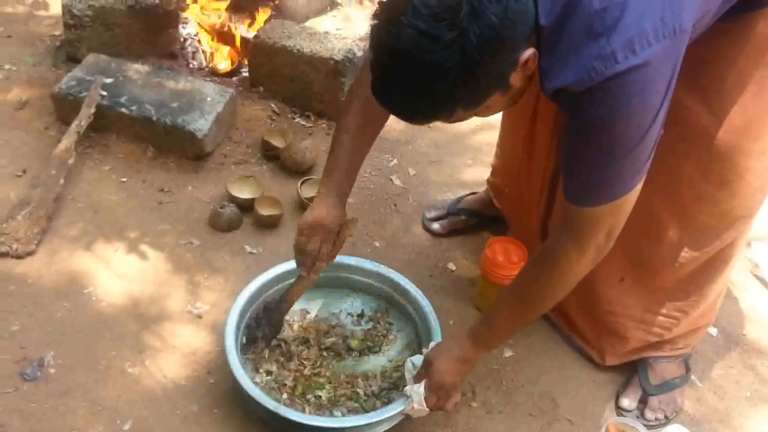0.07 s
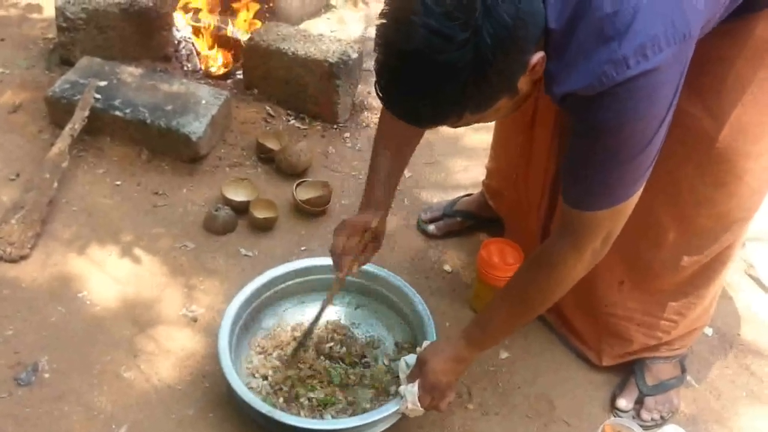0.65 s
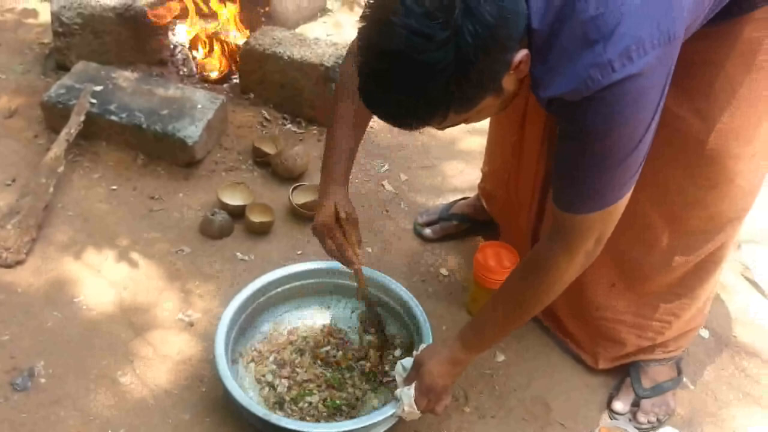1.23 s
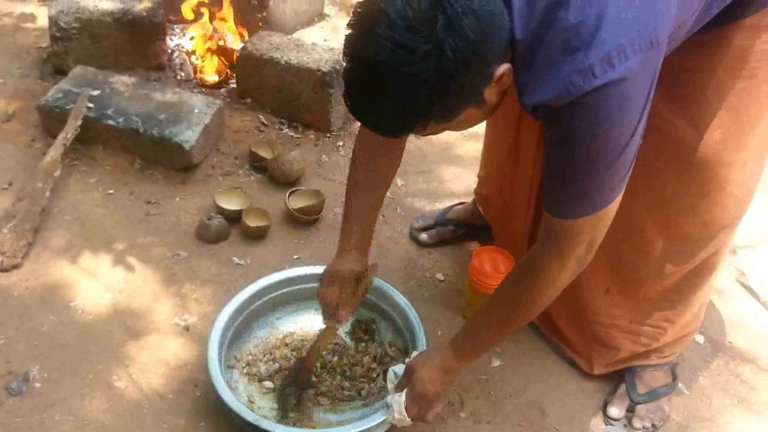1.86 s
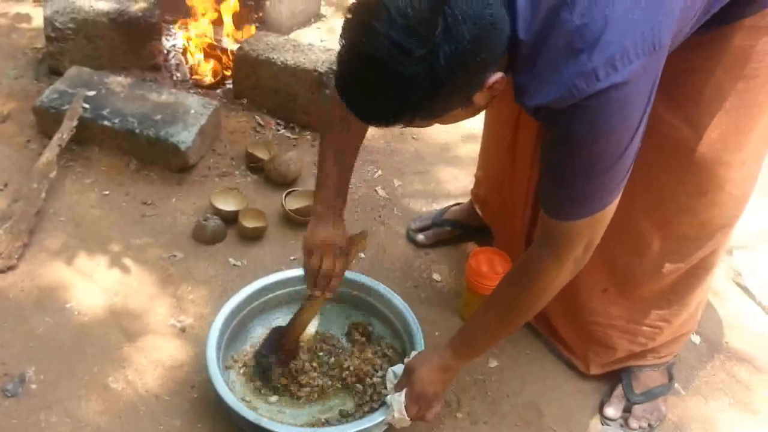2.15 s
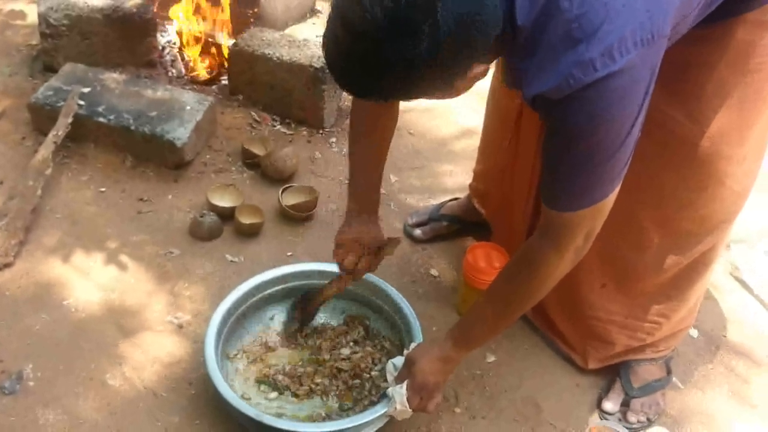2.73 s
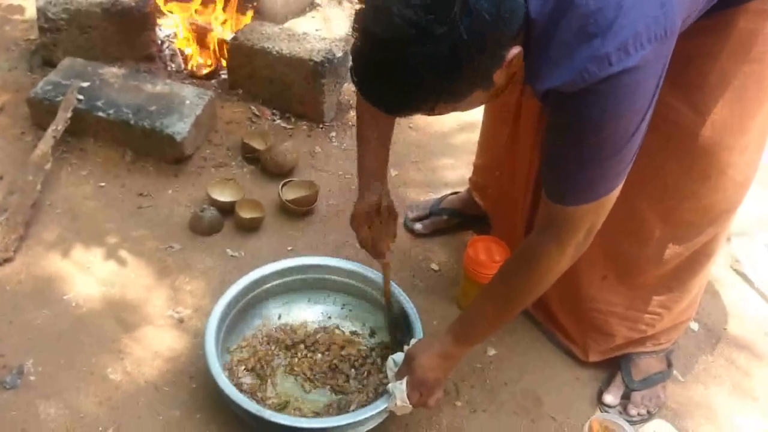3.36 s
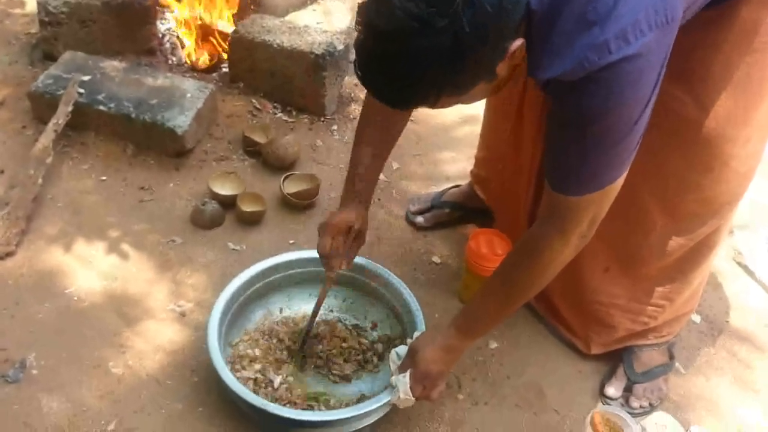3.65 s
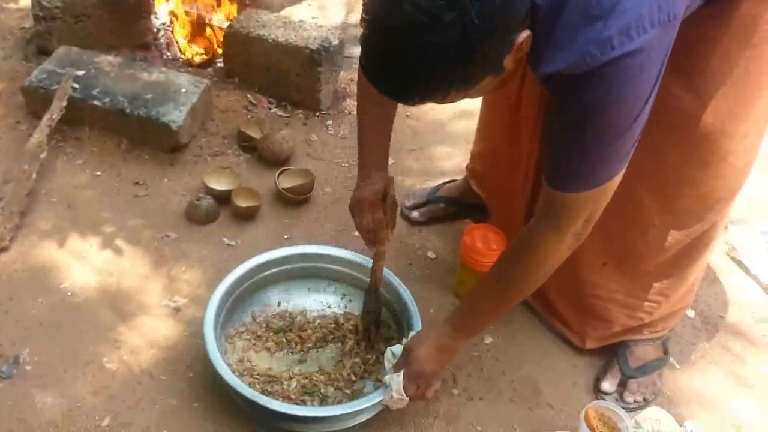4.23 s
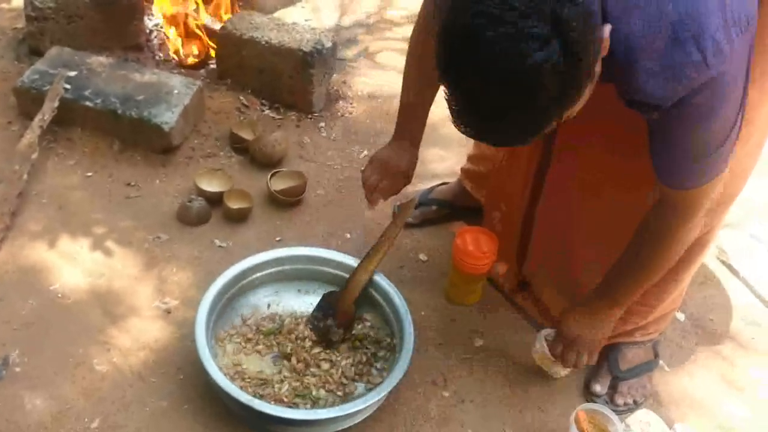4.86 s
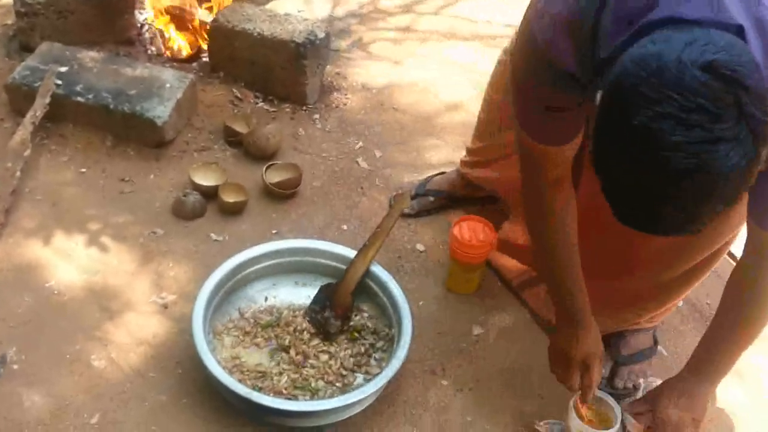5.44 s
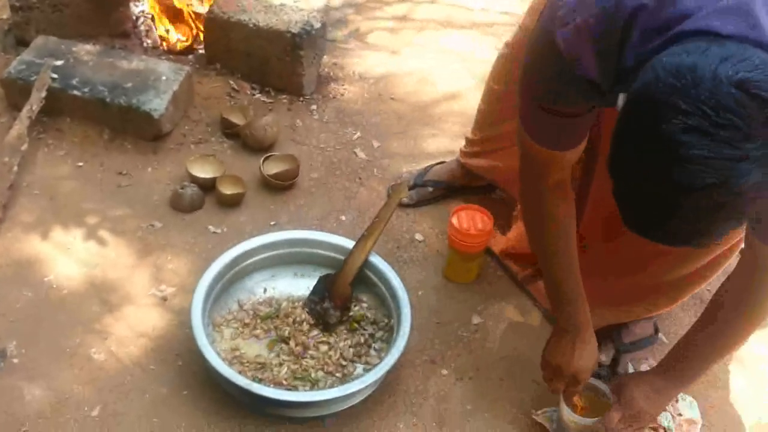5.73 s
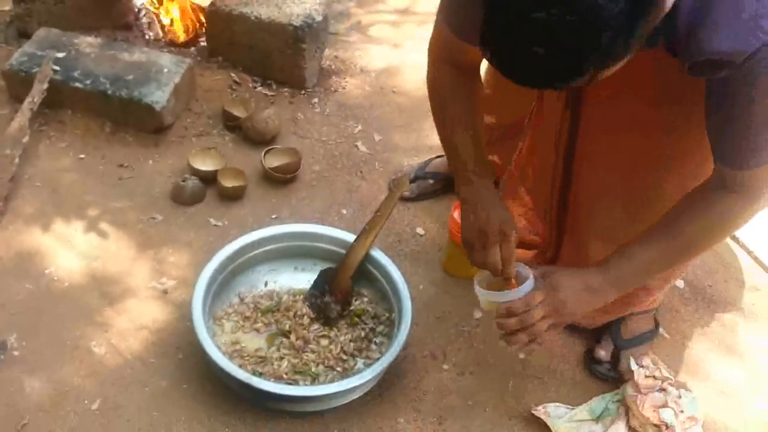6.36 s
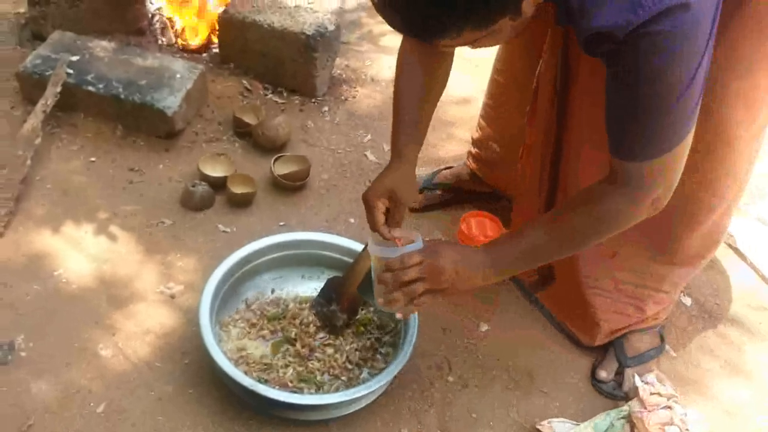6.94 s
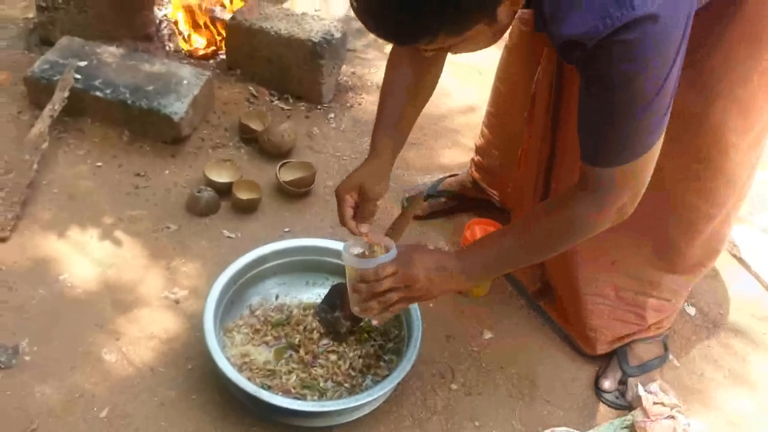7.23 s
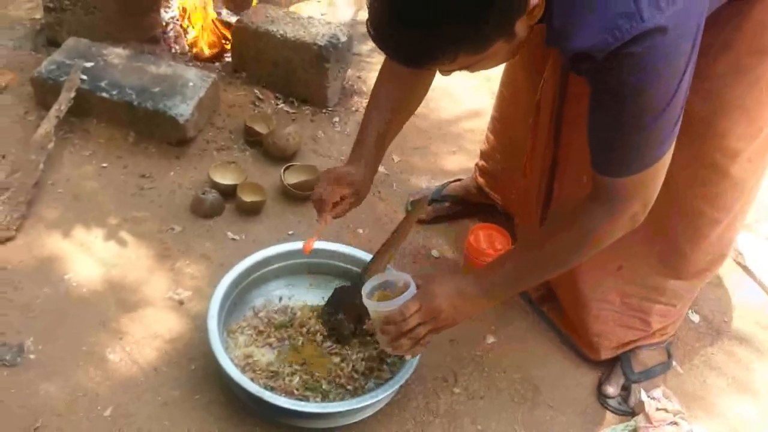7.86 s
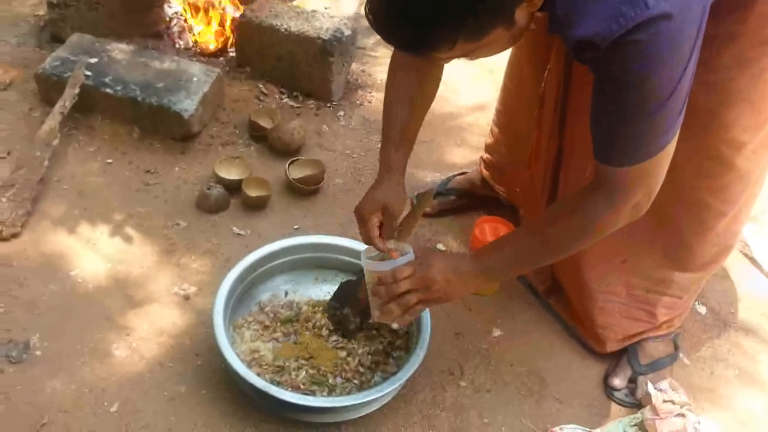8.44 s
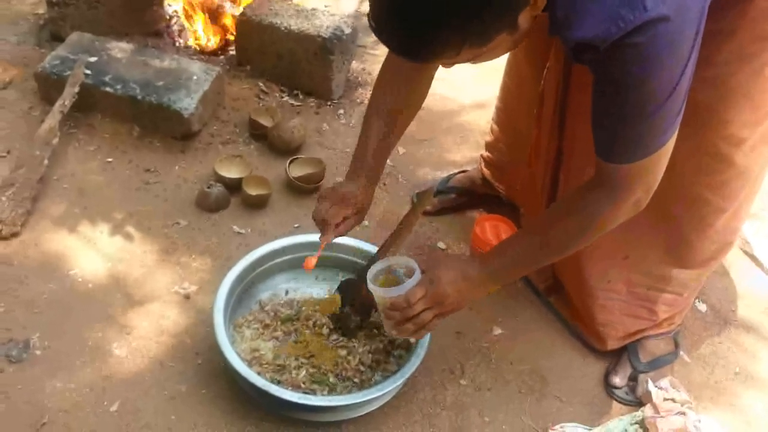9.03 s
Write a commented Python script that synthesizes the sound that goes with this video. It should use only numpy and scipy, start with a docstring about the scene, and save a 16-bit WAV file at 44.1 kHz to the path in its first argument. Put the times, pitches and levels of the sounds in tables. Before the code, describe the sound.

A wooden spatula scrapes around a wide metal basin close by, crunching moist chopped shallots and spices and knocking against the sides. About halfway through, the stirring stops and the handle clatters on the rim. A small spoon then ticks on a plastic jar, and a few soft, heavy thuds follow slightly to the left. Faint distant birds and the low rush of a wood fire fill the outdoor background.

```python
"""A wooden spatula scrapes and knocks in a wide metal basin of chopped shallots and spices, then falls
on the rim. Stick-slip friction and blows ring the basin's damped modes; seeds crack under the blade.
Next a small spoon ticks on a plastic jar; to the left, two faint foot shuffles, then soft heavy thuds
on the dirt yard. Behind it all: the low rush of a wood fire and open air, and far birds."""
import sys
import numpy as np
from scipy import signal
from scipy.fft import rfft, irfft, next_fast_len
from scipy.io import wavfile
from scipy.ndimage import uniform_filter1d, map_coordinates

SR = 44100
rng = np.random.default_rng(int(sys.argv[2]) if len(sys.argv) > 2 else 0)


def unload_wav(signal):
    """Save mono or channel-first audio to the path in sys.argv[1] as 16-bit WAV at rate SR, clipped to [-1, 1]."""
    wavfile.write(
        sys.argv[1],
        SR,
        np.round(np.clip(np.atleast_2d(signal).T, -1, 1) * 32767).astype(np.int16),
    )


N = 405279

# fire and air rush, spectrum: f/Hz, level/dB
RUSH_SPECTRUM = [(22, -24), (115, -5.5), (243, -1), (544, -9), (845, -11), (1110, -12.5), (2000, -27.5),
                 (2600, -50), (4400, -120)]
# rush over time: t/s, level/dB
RUSH_LEVEL = [(5, -55.5), (6.8, -56), (8.2, -56.5)]
# rush, left-right likeness: f/Hz, correlation
RUSH_CORRELATION = [(60, 0.71), (290, 0.57), (640, 0.266), (1400, 0.034), (3000, 0.51)]
# steady hiss: f/Hz, level/dB
HISS_SPECTRUM = [(500, -25.5), (1300, 1.5), (3000, 1), (4600, 0), (5600, -5.5), (13500, -2.5), (15000, -11)]
# yard echo, decay: f/Hz, t60/s
YARD_DECAY = [(200, 0.4), (1000, 0.37), (4000, 0.43), (12000, 0.12)]
# yard echo, colour: f/Hz, level/dB
YARD_SPECTRUM = [(200, -22.5), (800, -13.5), (2000, -18), (4500, -11), (12000, -2.5)]
# early reflections off ground and cook, decay: f/Hz, t60/s
EARLY_DECAY = [(200, 0.049), (12000, 0.052)]
# early reflections, colour: f/Hz, level/dB
EARLY_SPECTRUM = [(300, -17), (700, -11.5), (1500, -2), (4000, -5), (12000, -7.5)]
# first bird, chirps: t/s, length/s, start f/Hz, end f/Hz, level/dB
BIRD_CHIRPS = [(5.313, 0.124, 2445, 2650, -60), (5.66, 0.133, 2384, 2570, -62.5)]
# second bird, falling three-note calls: t/s, top f/Hz, level/dB
BIRD_CALLS = [(6.325, 4850, -66), (6.55, 4620, -58), (6.783, 4450, -60.5), (7.04, 4620, -66)]
# third bird, note onsets within a hoot: t/s
HOOT_ONSETS_S = [0, 0.025, 0.067]
# two foot shuffles, then soft heavy thuds: t/s, level/dB, rise/s, t60/s, thump offset/dB
DIRT_BUMPS = [(6.31, -51.5, 0.0033, 0.33, -14), (7.803, -44.5, 0.0018, 0.059, -4),
              (8.415, -21.5, 0.013, 0.32, 2), (8.653, -35, .007, 0.37, -8), (8.813, -39, 0.0055, 0.41, 5),
              (8.94, -42, 0.043, 0.38, 2)]
# hollow ring of a bump: f/Hz, level/dB, t60/s
THUMP_MODES = [(149, -14.5, .11), (223, -5.5, 0.11), (310, 1, 0.15), (398, -6, 0.42)]
# grit of the yard: f/Hz, level/dB
DIRT_SPECTRUM = [(50, -34), (138, -20), (215, -6), (295, 1), (420, 0), (520, -4.5), (816, -6.5),
                 (1000, -8.5), (1270, -10.5), (1900, -15.5), (4950, -26), (9000, -37.5), (15000, -71.5)]
# spoon on jar: t/s, level/dB
SPOON_TICKS = [(6.044, -25), (6.067, -21.5), (7.336, -7), (7.722, -2), (7.801, -23.5), (9.015, -18.5)]
# dry click of plastic: f/Hz, level/dB
JAR_SPECTRUM = [(200, -14), (900, -10), (1600, -6.5), (2500, -2.5), (4300, 7), (5600, 6.5), (6600, 2.5),
                (10500, -6), (15000, -18)]
# loaded basin: f/Hz, level struck inside/dB, level struck on rim/dB, t60/s
BASIN_MODES = [(233, -6, -2.5, .07), (336, 1, -6.5, .07), (404.3, -8, -9, .11), (525, -3.5, -12, .04),
               (750, -1.5, 2, 0.037), (830.5, 2.5, -6, 0.093), (886.5, -3, -1, 0.1),
               (1144, -1.5, 7.5, 0.035), (1789, -14.5, -2, 0.14), (2242, -6.5, 5.5, 0.081),
               (2365, -9, 6, .05), (2687, -3.5, 1, .04), (3360, -9, -12, 0.054), (3515, -11.5, -43, 0.036),
               (3658, -12, -13.5, 0.12), (4145, -14.5, -14, 0.055), (4805, -11, -22, 0.032),
               (5080, -18, -22, 0.033), (7570, -22, -44, .06)]
# seeds and shallots crushed: t/s, level/dB, t60/s
CRACK_BURSTS = [(0.105, -37, .12), (0.179, -32.5, 0.18), (.26, -31.5, 0.11), (.335, -28, 0.086),
                (0.361, -27, 0.29), (0.803, -41.5, 0.072), (.833, -35, 0.14), (0.867, -30.5, 0.18),
                (0.932, -33, 0.16), (1.02, -32, 0.042), (1.385, -44, 0.13), (1.477, -34, 0.13),
                (1.491, -30.5, 0.019), (1.886, -31.5, 0.043), (2.353, -30.5, 0.15), (2.84, -31.5, 0.29),
                (2.922, -30.5, 0.11), (4.1, -41, 0.044)]
# one crack: f/Hz, level/dB
CRACK_SPECTRUM = [(300, -20), (800, 7), (1500, -2.5), (2400, 4.5), (3600, 2.5), (4900, 0.5), (6000, -12),
                  (7600, -10), (11000, -20), (15000, -53)]
# spices sliding off the blade: t/s, level/dB
SPICE_SPILLS = [(0.684, -45), (1.34, -44), (2.118, -41), (2.642, -46.5), (3.33, -49), (3.71, -34),
                (3.979, -42), (4.164, -47), (4.321, -47), (4.566, -48)]
# blade chatter: t/s, length/s, start f/Hz, end f/Hz, level/dB, roughness 0-1
BLADE_JUDDERS = [(1.111, 0.18, 360, 353, -55.5, 0.25), (2.025, .19, 323, 311, -47.5, 0.22),
                 (3.137, 0.047, 672.5, 790, -16.5, 0.4), (3.174, 0.059, 747, 702, -28.5, .45),
                 (3.453, 0.072, 880, 920, -30.5, 0.3)]
# slips on bare metal: t/s, rise/s, fall/s, start f/Hz, end f/Hz, level/dB
BLADE_RASPS = [(.385, 0.02, 0.12, 1300, 950, -30), (1.02, 0.02, 0.086, 2580, 650, -41.5),
               (1.521, 0.0098, 0.014, 1760, 1400, -31.5), (1.545, 0.025, 0.038, 1200, 600, -30),
               (1.9, 0.066, 0.05, 1900, 1270, -29.5), (1.985, 0.021, 0.031, 1390, 850, -28),
               (2.4, 0.073, 0.027, 1960, 1180, -30.5), (3.09, 0.019, 0.035, 1250, 1360, -33),
               (3.142, 0.011, 0.027, 1450, 1250, -20), (3.455, 0.0023, 0.0097, 3940, 3670, -14),
               (3.46, .008, 0.13, 3200, 2850, -32), (3.58, .038, .02, 1290, 1240, -29.5),
               (3.624, .028, .026, 1100, 760, -23.5), (4.04, .033, .04, 1080, 900, -35),
               (4.305, 0.0097, 0.09, 1800, 1660, -47.5), (4.405, .025, 0.032, 1500, 1200, -50)]
# strokes: start t/s, hardest push t/s, lift t/s, level at push/dB, swell before/dB, easing after/dB,
# drum offset/dB, crunch offset/dB, pitch factor
STIR_STROKES = [(-.03, 0, .019, -41.5, 3, 8.5, -8, 7.5, 1.1),
                (.101, .403, .515, -29.5, 12.5, 11, -5.5, 2.5, 1.08),
                (.797, 1.005, 1.11, -33.5, 3.5, 8, 0, -1.5, 1),
                (1.368, 1.53, 1.717, -31.5, 12, 28.5, -5, -5, .97),
                (1.866, 2.01, 2.113, -29.5, 1.5, 14.5, -9.5, -7, 1.02),
                (2.328, 2.482, 2.565, -35.5, 0, 19, -3, -2.5, 1.04),
                (2.733, 2.857, 3.023, -28.5, 16, 12.5, -6.5, -1, 1.08),
                (3.08, 3.159, 3.19, -21, 20, 13, -14, -8, .92),
                (3.449, 3.47, 3.55, -30, 2, 10, -12, 2, 1.12),
                (3.564, 3.652, 3.774, -26.5, 13, 33, -14, -10, .95),
                (4.034, 4.081, 4.118, -32.5, 9, 10, -8, -9, 1.03)]
# basin floor drumming: f/Hz, level/dB
DRUM_SPECTRUM = [(60, -38.5), (150, -13.5), (250, -4), (380, 0), (520, -3), (700, -13), (1500, -51)]
# wood dragging on metal: f/Hz, level/dB
DRAG_SPECTRUM = [(200, -36.5), (450, -14.5), (640, -3.5), (790, 3), (920, -2.5), (1030, -8.5), (1180, -1),
                 (1500, -8), (2000, -13.5), (2600, -12), (3600, -14), (8000, -58.5)]
# moist spices crunching: f/Hz, level/dB
CRUNCH_SPECTRUM = [(600, -32.5), (1600, 0), (2400, 3), (3000, -4), (3550, 2), (4500, 1.5), (5200, -4),
                   (6000, -9), (7600, -7.5), (11000, -16), (15000, -43.5)]
# spatula blows: t/s, level/dB, tilt/(dB/octave), contact/ms, t60 factor, wall drive/dB
SPATULA_BLOWS = [(.124, -6, -3, 0.12, 0.96, 1.5), (.132, -7.5, -3, 0.95, 0.95, -2),
                 (.337, -13.5, 1.5, .14, .8, -15), (.39, -9, 8, 0.16, .35, 2),
                 (.744, -28, 3.5, 0.088, .13, -6), (.775, -29.5, 13, 0.17, .25, -3),
                 (.835, -20.5, -3.5, 0.12, 0.7, 3), (1.851, -8, 0.5, 0.078, .85, -1.5),
                 (2.048, -17.5, 7, 0.12, 0.19, 4), (2.122, -22.5, 3.5, 0.063, 0.15, -5),
                 (2.306, -6.5, -0.5, 0.12, 0.28, 1), (2.31, -1, 4, 0.72, 0.68, -5.5),
                 (2.517, -24, 9, 0.16, .25, -7.5), (2.7075, -16, 2.5, 0.13, 0.11, 0.5),
                 (2.708, 1.5, 0.5, 0.46, 0.44, -3), (2.881, -5, 7.5, 0.15, 0.97, -1.5),
                 (3.129, -14.5, 7, .2, .55, -2), (3.243, -13.5, 2.5, 0.1, 0.13, 10.5),
                 (3.456, 0.5, 6.5, 0.25, 0.39, -2), (3.711, -18.5, 7, 0.12, 0.2, -12),
                 (4.253, -31, 5, 0.072, .31, 5), (4.372, -26.5, 0, 0.13, .22, 6),
                 (4.614, -27.5, 2, 0.077, 0.89, 3), (5.153, -33, 3.5, 0.096, 0.46, -14)]
# handle rattling on the rim: t/s, level/dB, contact/ms
RIM_BOUNCES = [(4.714, -3.5, 0.25), (4.729, -15, 1), (4.747, -8.5, 0.18), (4.76, -14.5, 0.94),
               (4.778, -23.5, .25)]

STIR_END_S, TOP_HZ = 4.7, 15000


def amp(db):
    """Decibels to gain."""
    return 10 ** (np.asarray(db) / 20)


def unit(x):
    """Scale to rms 1."""
    return x / np.sqrt(np.mean(x ** 2) + 1e-20)


def along(points, hz):
    """Interpolate (f/Hz, value) points on a log axis."""
    f, v = np.transpose(points)
    return np.interp(np.log(hz + 1), np.log(f + 1), v)


def wobble(rate_hz):
    """Smooth random curve, rate_hz knots a second."""
    knots = rng.standard_normal(int(N * rate_hz / SR) + 4)
    return map_coordinates(knots, [np.arange(N) * rate_hz / SR])


def grains(rate_hz, spread_db, size=N):
    """Random impulses of uneven size, rms 1."""
    impulses = (rng.random(size) < rate_hz / SR) * rng.choice([-1, 1], size)
    return unit(impulses * amp(spread_db * np.clip(rng.standard_normal(size), -2, 2)))


def add(track, s, x):
    """Mix x into the track from time s."""
    part = track[max(round(s * SR), 0):][:len(x)]
    part += x[:len(part)]


def filtered(x, response):
    """Apply a complex frequency response."""
    n = x.shape[-1]
    m = next_fast_len(n + 8192)
    return irfft(rfft(x, m) * response(np.fft.rfftfreq(m, 1 / SR)), m)[..., :n]


def coloured(x, spectrum, size=2048):
    """Minimum-phase filter from (f/Hz, level/dB) points."""
    cepstrum = irfft(np.log(amp(along(spectrum, np.fft.rfftfreq(size, 1 / SR)))))
    cepstrum[1:size // 2] *= 2
    cepstrum[size // 2 + 1:] = 0
    return signal.oaconvolve(x, irfft(np.exp(rfft(cepstrum))))[:len(x)]


def placed(x, lag_ms, left_db, treble_left_db):
    """Mono to stereo; lag and levels are left relative to right."""
    def response(hz):
        shade_db = along([(400, left_db), (8000, treble_left_db)], hz)
        left = amp(shade_db / 2) * np.exp(-1j * np.pi * hz * lag_ms / 1e3)
        return np.array([left, 1 / left])
    return filtered(x, response)


def reflections(x, decay, spectrum, blocks=24):
    """Diffuse stereo echo; a new tail per block keeps it smooth, with no steady ringing."""
    out, n = np.zeros((2, N)), int(SR * max(t60 for _, t60 in decay)) + 512
    send, step = coloured(x, spectrum), N // blocks + 1
    for start in range(0, N, step):
        hz, t, z = signal.stft(rng.standard_normal((2, n)), SR, nperseg=128)
        tails = signal.istft(z * amp(-60 * t / along(decay, hz)[:, None]), SR, nperseg=128)[1]
        for channel, tail in zip(out, tails):
            echo = signal.fftconvolve(send[start:start + step], tail / np.linalg.norm(tail))
            add(channel, start / SR, echo)
    return out


def fire_and_air():
    """Low rush of fire and open air under a thin steady hiss."""
    def mid_side(hz):
        angle = np.arccos(np.clip(along(RUSH_CORRELATION, hz), -1, 1)) / 2
        return amp(along(RUSH_SPECTRUM, hz)) * [np.cos(angle), np.sin(angle)]

    mid, side = filtered(rng.standard_normal((2, N)), mid_side)
    level_db = np.interp(np.arange(N) / SR, *np.transpose(RUSH_LEVEL))
    rush = amp(level_db + .8 * wobble(7)) * unit(np.array([mid + side, mid - side]))
    hiss = unit(filtered(rng.standard_normal((2, N)), lambda hz: amp(along(HISS_SPECTRUM, hz))))
    return (rush + amp(-55.5) * hiss) * amp([[-.6], [.6]])


def birds():
    """Far raspy chirps, falling calls and slowing triple hoots, blurred by the trees."""
    out = np.zeros(N)
    blur = wobble(170) + 1j * wobble(170)
    jitter = wobble(1600)

    def voice(s, hz, rasp_rad):
        span = slice(int(s * SR), int(s * SR) + len(hz))
        phase = 2 * np.pi * np.cumsum(hz) / SR + rasp_rad * jitter[span]
        return (blur[span] * np.exp(1j * phase)).real

    def note(s, length_s, start_hz, end_hz, db, rasp_rad):
        n = int(length_s * SR)
        tone = voice(s, np.linspace(start_hz, end_hz, n), rasp_rad)
        add(out, s, amp(db) * unit(tone * np.sqrt(np.hanning(n))))

    for chirp in BIRD_CHIRPS:
        note(*chirp, rasp_rad=.9)

    t = np.arange(SR // 3) / SR
    step_s, step_ratio, t60_s = .017, .855, .3
    envelope = np.minimum(t / .004, 1) * amp(-60 * t / t60_s)
    for s, top_hz, db in BIRD_CALLS:
        for k, note_db in enumerate([-5, 1.5, 1]):
            onset_s = s + k * step_s
            hz = top_hz * step_ratio ** k * (1 + .08 * np.exp(-t / .006))
            add(out, onset_s, amp(db + note_db) * envelope * unit(voice(onset_s, hz, rasp_rad=.6)))

    first_s, period_s, slowing_s = 5.507, .21, .003
    for hoot in range(6):
        for offset_s in HOOT_ONSETS_S:
            s = first_s + hoot * period_s + hoot ** 2 * slowing_s + offset_s
            note(s, .0173, 1327, 1024, db=-59, rasp_rad=.62)
            note(s, .015, 596, 460, db=-61.5, rasp_rad=.19)
    return out


def shuffles_and_thuds():
    """Two faint foot shuffles, then soft heavy thuds on the dirt: grit plus a hollow thump."""
    force, thumps, t = np.zeros(N), np.zeros(N), np.arange(SR // 2) / SR
    hz, mode_db, mode_t60_s = np.transpose(THUMP_MODES)[:, :, None]
    for s, db, rise_s, t60_s, thump_db in DIRT_BUMPS:
        swell = 1 - np.exp(-(t / rise_s) ** 2)
        add(force, s, amp(db + 6 - 60 * t / t60_s) * swell)
        phase = 2 * np.pi * (hz * t + rng.random(hz.shape))
        ring = np.sum(amp(mode_db - 60 * t / mode_t60_s) * np.sin(phase), axis=0)
        add(thumps, s + rise_s / 2, amp(db + thump_db + 5.5) * swell * ring)
    return force * unit(coloured(grains(3000, spread_db=5.5), DIRT_SPECTRUM)) + thumps


def spoon(t60_s=.017):
    """A light spoon on the plastic jar: snap plus brief rattle."""
    out, t = np.zeros(N), np.arange(SR // 20) / SR
    for s, db in SPOON_TICKS:
        contact = amp(-60 * t / t60_s) * rng.standard_normal(len(t))
        contact[0] += 6  # snap
        tick = coloured(contact, JAR_SPECTRUM)
        add(out, s, amp(db - 1.5) * tick / np.abs(tick).max())
    return out


def crunches():
    """Each crushed seed or shallot piece gives a short burst of cracks."""
    out, t = np.zeros(N), np.arange(SR // 6) / SR
    for s, db, t60_s in CRACK_BURSTS:
        envelope = amp(-60 * t / t60_s) * (1 - np.exp(-t / .0015))
        burst = coloured(envelope * grains(1000, spread_db=4.5, size=len(t)), CRACK_SPECTRUM)
        add(out, s, amp(db) * burst / np.std(burst[:SR // 50]))
    return out


def spill_gain(rustle_db=-57.5, rise_s=.006, fall_db_per_s=170.5):
    """Loose spices slide off the blade and trickle out, over the pile's faint rustle."""
    t = np.arange(SR // 2) / SR
    gain = amp(rustle_db) * (np.arange(N) / SR < STIR_END_S)
    for s, db in SPICE_SPILLS:
        add(gain, s, amp(db - fall_db_per_s * t) * (1 - np.exp(-t / rise_s)))
    return gain


def judders():
    """The blade chatters on the metal: a brief groan, unsteady in pitch and level."""
    out = np.zeros(N)
    waver, grip = wobble(300), wobble(260)
    for s, length_s, start_hz, end_hz, db, rough in BLADE_JUDDERS:
        n, at = int(length_s * SR), int(s * SR)
        hz = np.linspace(start_hz, end_hz, n) * (1 + .1 * rough * waver[at:at + n])
        phase = 2 * np.pi * np.cumsum(hz) / SR
        groan = (np.sin(phase) + rough / 2 * np.sin(2 * phase)) * amp(7 * rough * grip[at:at + n])
        add(out, s, amp(db) * unit(groan * np.hanning(n)))
    return out


def rasps(half_width_oct=.59, skirt_db=-25):
    """Quick slips of wood on metal through one broad gliding resonance."""
    out, t = np.zeros(N), np.arange(SR // 4) / SR
    for s, rise_s, fall_s, start_hz, end_hz, db in BLADE_RASPS:
        hz, frame_s, slips = signal.stft(grains(2600, spread_db=4, size=len(t)), SR, nperseg=256)
        centre_hz = start_hz * (end_hz / start_hz) ** np.minimum(frame_s / (rise_s + fall_s), 1)
        detune = np.log2((hz[:, None] + 1) / centre_hz) / half_width_oct
        resonance = np.exp(-detune ** 2 / 2) + amp(skirt_db) / (1 + detune ** 2)
        rasp = signal.istft(slips * resonance, SR, nperseg=256)[1][:len(t)]
        add(out, s, amp(db) * np.interp(t, [0, rise_s, rise_s + fall_s], [0, 1, 0]) * unit(rasp))
    return out


def basin_ring(tilt_db_per_oct, contact_ms, t60_factor, wall_db, scatter_db, on_rim=False):
    """Basin response to one blow: longer contact mutes high modes; rim blows favour the wall's."""
    t = np.arange(SR // 5) / SR
    hz, inside_db, rim_db, t60_s = np.transpose(BASIN_MODES)[:, :, None]
    mode_db = (rim_db if on_rim else inside_db) + scatter_db * rng.standard_normal(hz.shape)
    strength = amp(mode_db) * rng.choice([-1, 1], hz.shape)
    modes = np.sum(strength * amp(-60 * t / (t60_s * t60_factor)) * np.sin(2 * np.pi * hz * t), axis=0)
    # wooden blade and the many dead modes
    clack = coloured(rng.standard_normal(len(t)) * amp(-60 * t / .014),
                     [(150, 5.5), (300, 16), (800, 17), (1600, 10), (3600, 8), (5000, 4.5),
                      (6200, -7.5), (11000, -6.5), (15000, -25.5)])
    grid_hz, wall_hz = np.geomspace(30, SR / 2, 80), 2167
    tilt_db = tilt_db_per_oct * np.log2(np.maximum(grid_hz, 550) / 1e3)
    contact_db = -10 * np.log10(1 + (grid_hz * contact_ms / 1e3) ** 6)
    spot_db = wall_db * np.exp(-(np.log2(grid_hz / wall_hz) / .3) ** 2)
    edge_db = along([(40, -35), (130, -19), (300, 0)], grid_hz)  # long waves cancel around the edge
    return coloured(modes + clack, np.c_[grid_hz, tilt_db + contact_db + spot_db + edge_db])


def stroke_gains(bite_s=.012, release_db_per_s=400, settle_db_per_s=196.5):
    """Drum, drag and crunch gains: each stroke bites, swells, eases and lifts; drag dies first."""
    t, gains = np.arange(SR) / SR, np.zeros((3, N))
    for start_s, push_s, lift_s, db, swell_db, ease_db, drum_db, crunch_db, _ in STIR_STROKES:
        now_s = max(start_s, 0) + t
        force_db = np.interp(now_s, [start_s, push_s, lift_s], [db - swell_db, db, db - ease_db])
        travel = np.clip((now_s - start_s) / (lift_s - start_s), 0, 1)
        lifted_s = np.maximum(now_s - lift_s, 0)
        bite = np.clip((now_s - start_s) / bite_s, 0, 1)
        settle_db = settle_db_per_s * lifted_s
        shares_db = [drum_db - 10.5 * travel - settle_db,  # blade leaves the floor
                     -release_db_per_s * lifted_s,
                     crunch_db - 5 * travel - settle_db]  # blade leaves the pile
        for gain, share_db in zip(gains, shares_db):
            add(gain, start_s, bite * amp(force_db + share_db))
    return gains


def shifting_resonances(x, depth_db):
    """Broad, dead resonances come and go as the blade crosses the floor."""
    z = signal.stft(x, nperseg=512)[2]
    field = uniform_filter1d(rng.standard_normal(z.shape), 2, axis=0)
    field = uniform_filter1d(field, 10, axis=1)
    return signal.istft(z * amp(depth_db * unit(field)), nperseg=512)[1][:N]


def stirring():
    """Wood sticks and slips on metal, moist spices swish under it; both ring the basin."""
    drum_gain, drag_gain, crush_gain = stroke_gains()
    spice_gain = np.hypot(crush_gain, spill_gain())
    pressure_db = 1.1 * wobble(55)
    starts_s, *_, pitches = np.transpose(STIR_STROKES)
    starts_s = np.maximum(starts_s, 0)
    rings = [basin_ring(-1, contact_ms=.1, t60_factor=.7, wall_db=0, scatter_db=4) for _ in starts_s]

    def rubbed(slips, spectrum, pitches, ring_db):
        """Each stroke rubs a new spot with its own mix of modes."""
        out = np.zeros(N)
        for s, end_s, pitch, ring in zip(starts_s, [*starts_s[1:], STIR_END_S], pitches, rings):
            stroke = slips[round(s * SR):round(end_s * SR)]
            friction = unit(coloured(stroke, np.multiply(spectrum, [pitch, 1])))
            ringing = unit(signal.fftconvolve(friction, ring)[:len(friction)])
            add(out, s, unit(friction + amp(ring_db) * ringing))
        return shifting_resonances(out, depth_db=3)

    drum = amp(3) * drum_gain * rubbed(grains(1500, spread_db=4), DRUM_SPECTRUM, pitches, ring_db=-9)
    drag = amp(-1) * drag_gain * rubbed(grains(2200, spread_db=3.5), DRAG_SPECTRUM, pitches, ring_db=-8.5)
    swish = grains(2200, spread_db=3)
    flicker = amp(-4 + 2.6 * wobble(110))
    crunch = spice_gain * flicker * rubbed(swish, CRUNCH_SPECTRUM, np.ones_like(pitches), ring_db=-28)
    seeds = amp(-9) * spice_gain * coloured(grains(80, spread_db=6), CRACK_SPECTRUM)
    return amp(pressure_db) * (drum + drag + crunch) + seeds


def knocks():
    """The spatula strikes a new spot of the basin each time; its handle falls on the rim."""
    out = np.zeros(N)

    def strike(s, db, ring):
        add(out, s, amp(db - 9.5) * ring / np.std(ring[:SR // 200]))

    for s, db, *contact in SPATULA_BLOWS:
        strike(s, db, basin_ring(*contact, scatter_db=4.5))
    for s, db, contact_ms in RIM_BOUNCES:
        strike(s, db, basin_ring(1.5, contact_ms, t60_factor=.8, wall_db=0, scatter_db=1.5, on_rim=True))
    return out


def scene():
    """Basin and jar just right of centre, shuffles and thuds leading on the left, birds all around."""
    blows = knocks()
    scrape = stirring() + rasps() + crunches() + judders()
    ticks, bumps, song = spoon(), shuffles_and_thuds(), birds()
    basin = placed(blows + scrape, lag_ms=.061, left_db=-1.5, treble_left_db=-9)
    basin += reflections(blows + scrape, EARLY_DECAY, EARLY_SPECTRUM)
    jar = placed(ticks, lag_ms=.08, left_db=-2, treble_left_db=-5)
    ground = placed(bumps, lag_ms=-.26, left_db=-2.4, treble_left_db=-9)
    ground += reflections(amp(6) * bumps, EARLY_DECAY, EARLY_SPECTRUM)
    send = amp(2) * blows + amp(-4.5) * scrape + amp(-12) * ticks + amp(7.5) * bumps + amp(15.5) * song
    yard = reflections(send, YARD_DECAY, YARD_SPECTRUM)
    return basin + jar + ground + amp(1.5) * song + yard + fire_and_air()


def record(dry):
    """Clip at full scale, then low-pass steeply at TOP_HZ."""
    return filtered(np.clip(dry, -1, 1), lambda hz: 1 / (1 + (hz / TOP_HZ) ** 120))


dry = scene()
out = record(dry)
unload_wav(out)
```